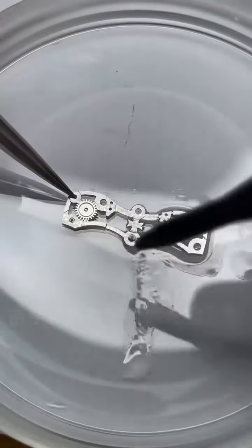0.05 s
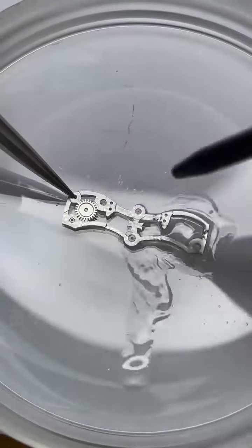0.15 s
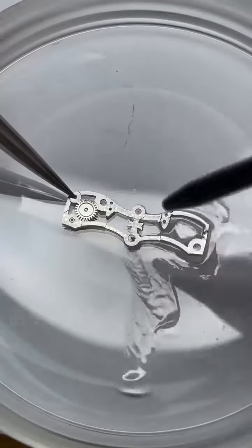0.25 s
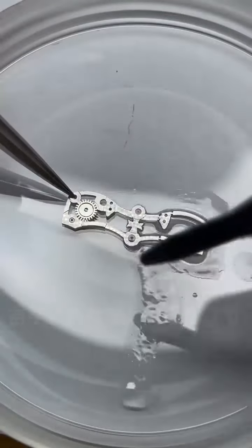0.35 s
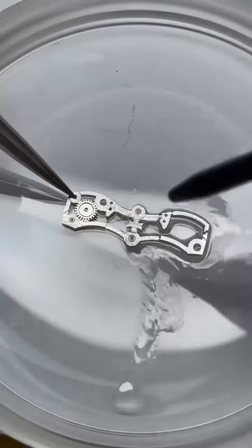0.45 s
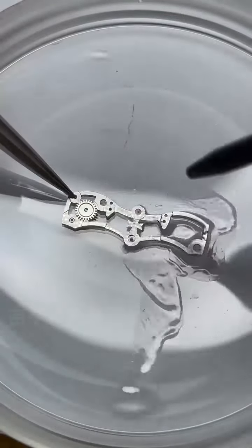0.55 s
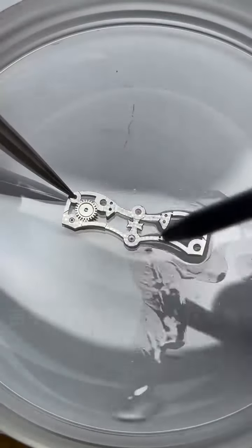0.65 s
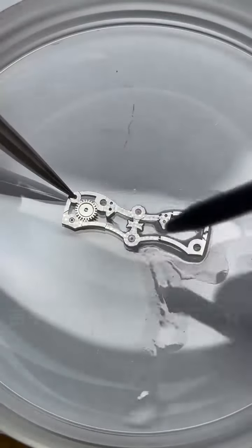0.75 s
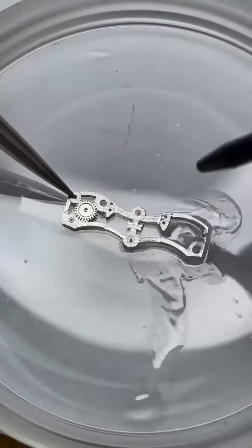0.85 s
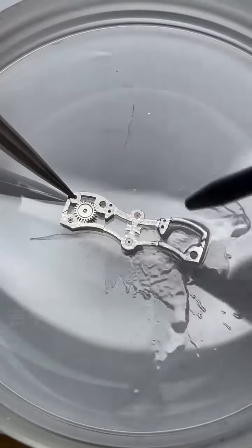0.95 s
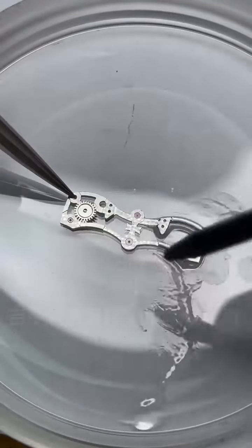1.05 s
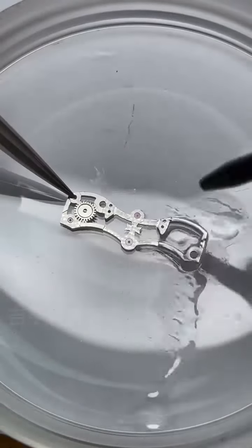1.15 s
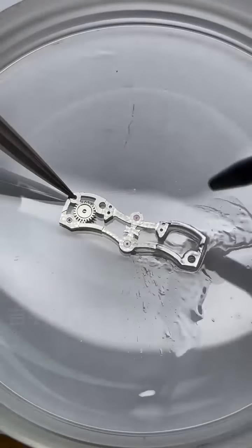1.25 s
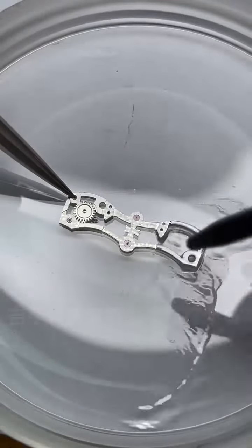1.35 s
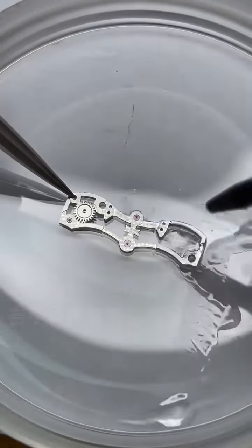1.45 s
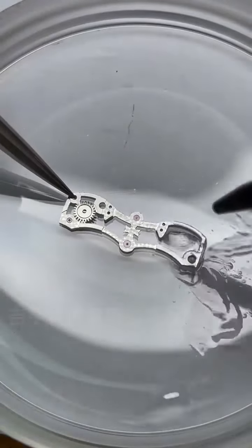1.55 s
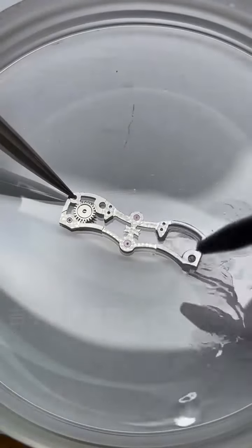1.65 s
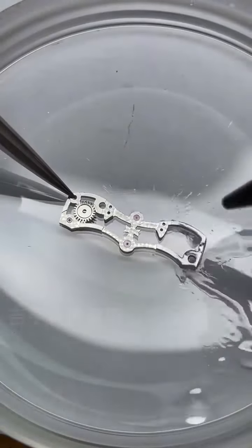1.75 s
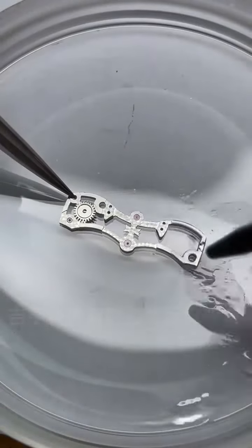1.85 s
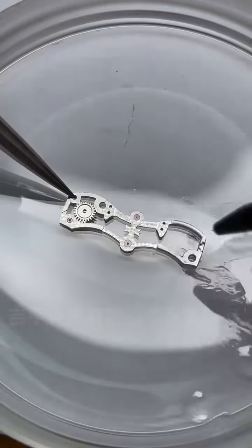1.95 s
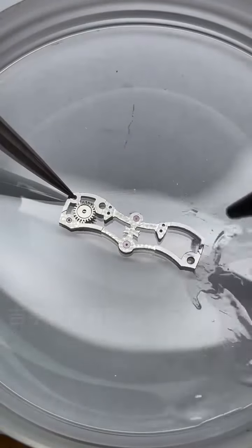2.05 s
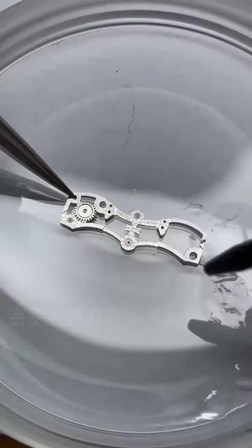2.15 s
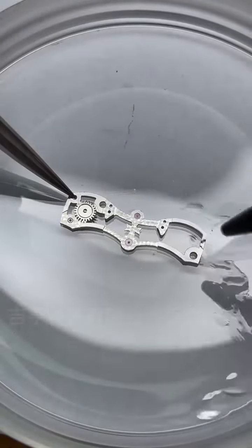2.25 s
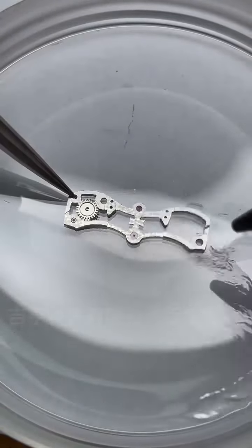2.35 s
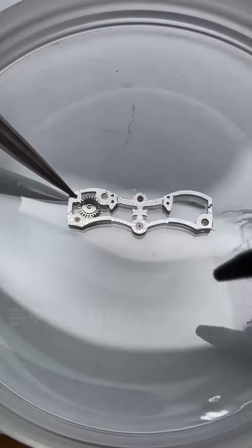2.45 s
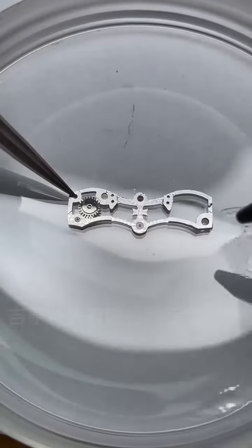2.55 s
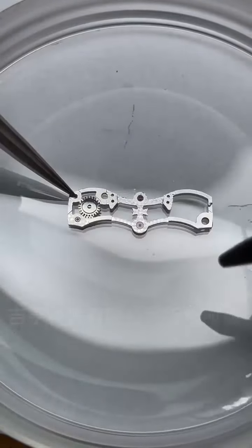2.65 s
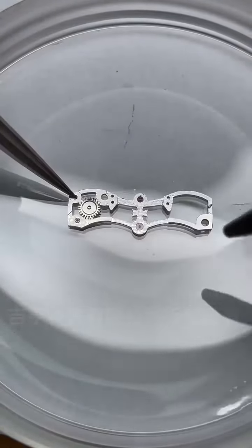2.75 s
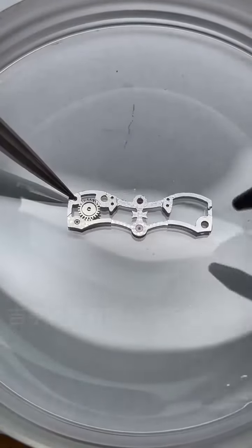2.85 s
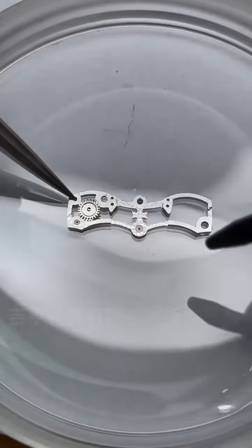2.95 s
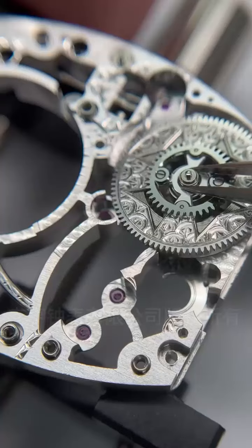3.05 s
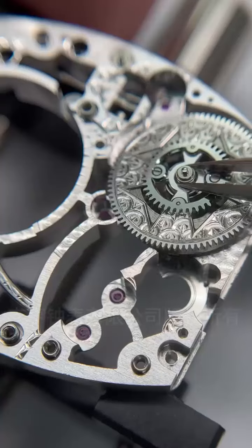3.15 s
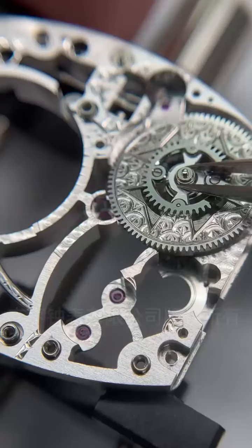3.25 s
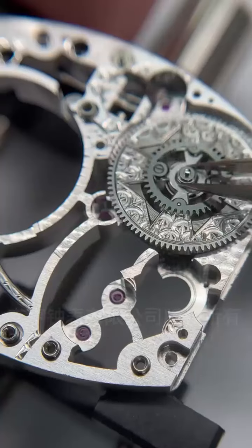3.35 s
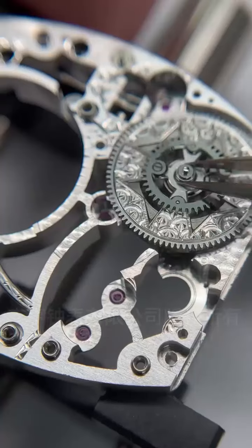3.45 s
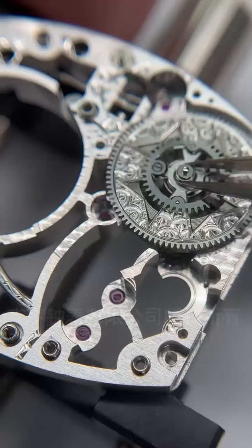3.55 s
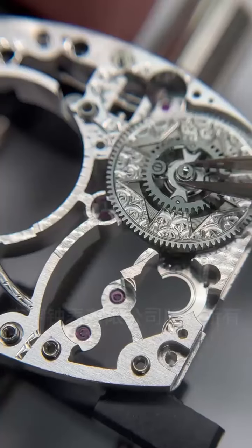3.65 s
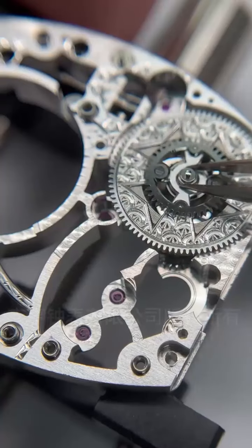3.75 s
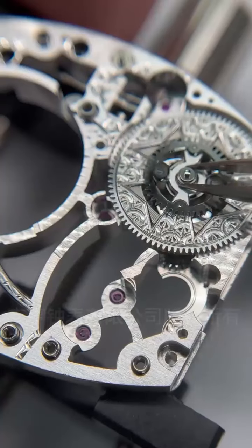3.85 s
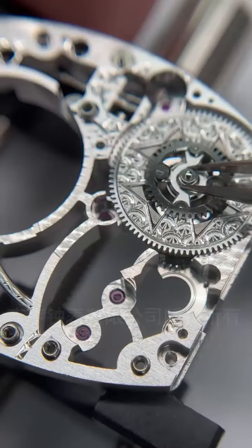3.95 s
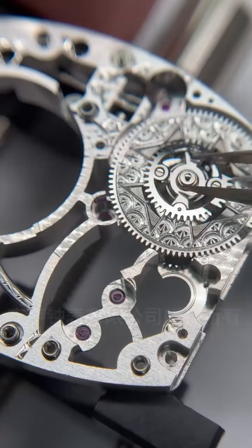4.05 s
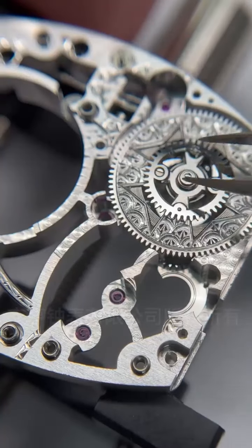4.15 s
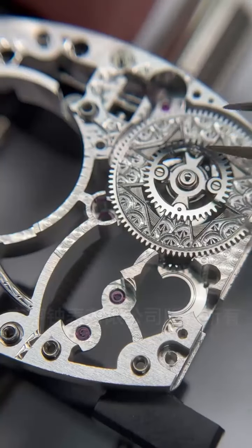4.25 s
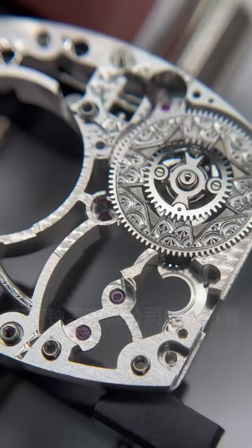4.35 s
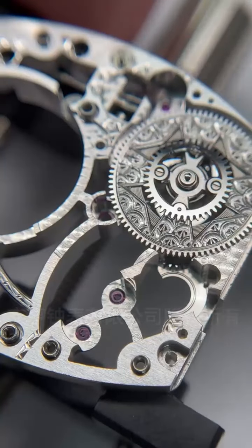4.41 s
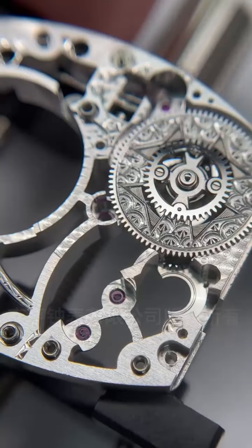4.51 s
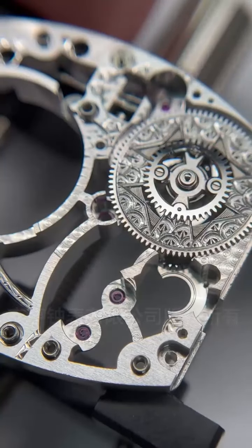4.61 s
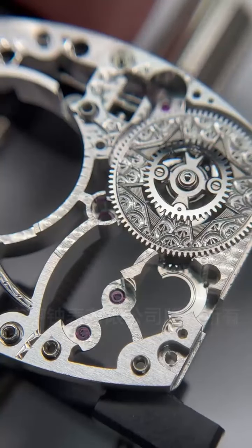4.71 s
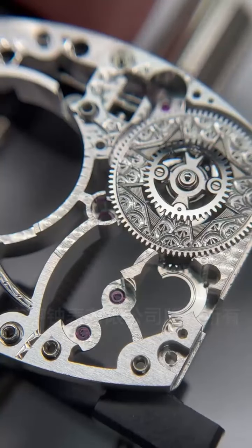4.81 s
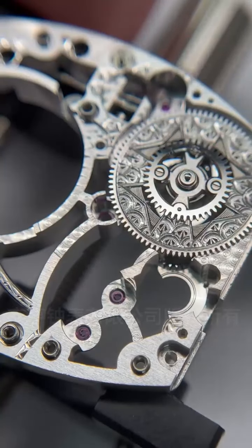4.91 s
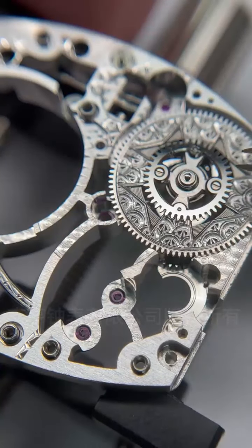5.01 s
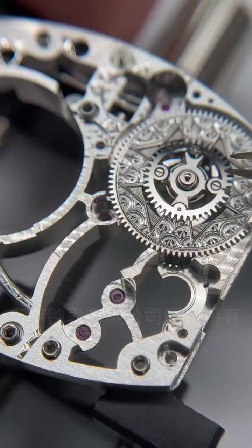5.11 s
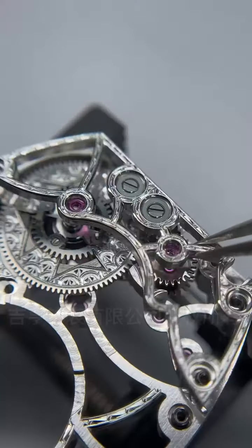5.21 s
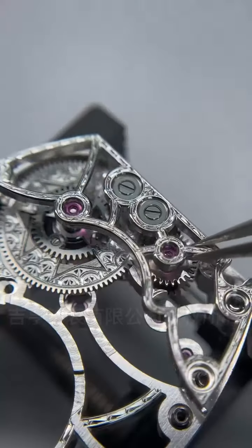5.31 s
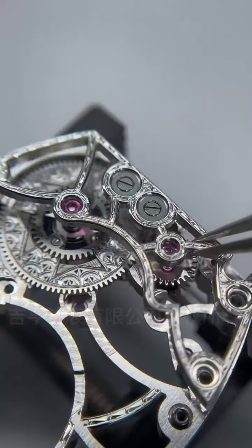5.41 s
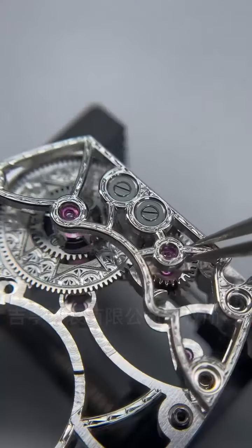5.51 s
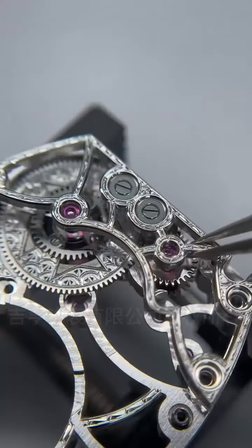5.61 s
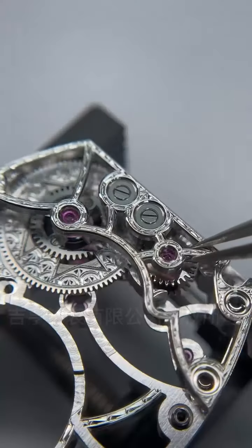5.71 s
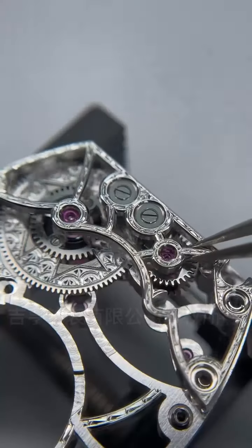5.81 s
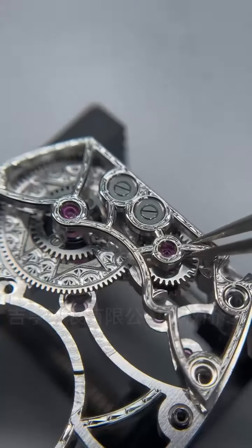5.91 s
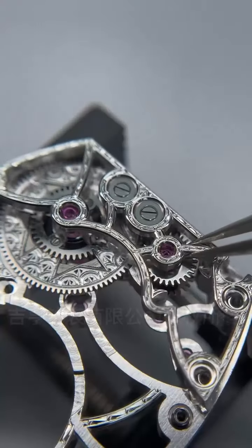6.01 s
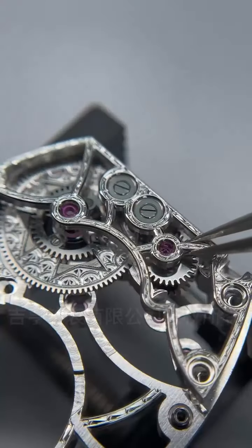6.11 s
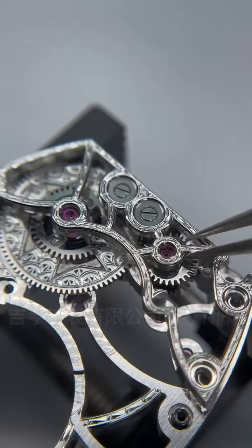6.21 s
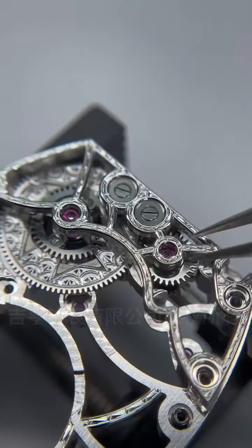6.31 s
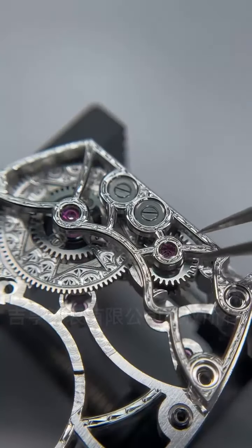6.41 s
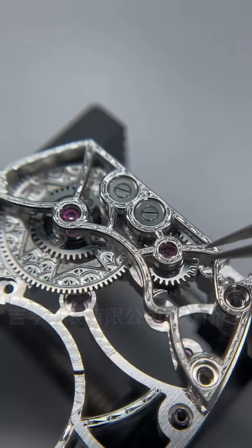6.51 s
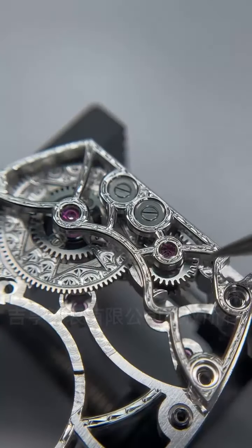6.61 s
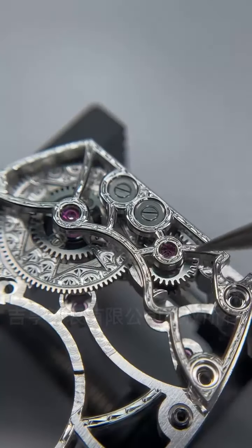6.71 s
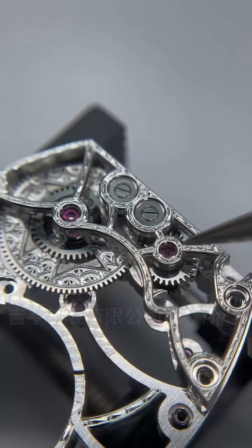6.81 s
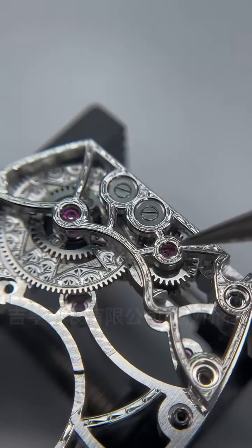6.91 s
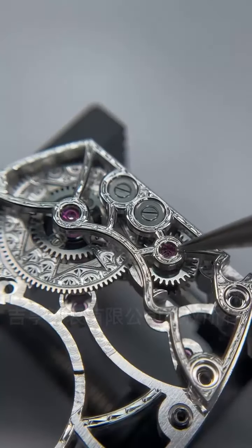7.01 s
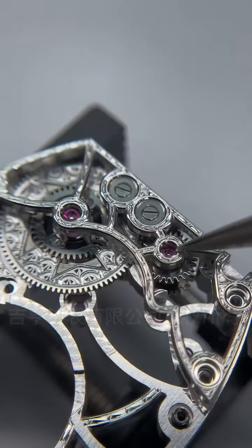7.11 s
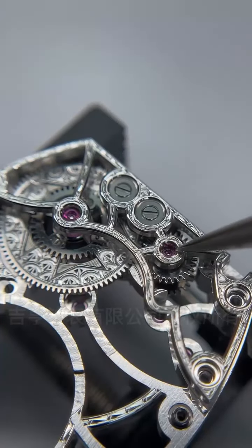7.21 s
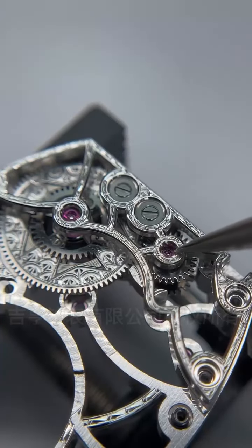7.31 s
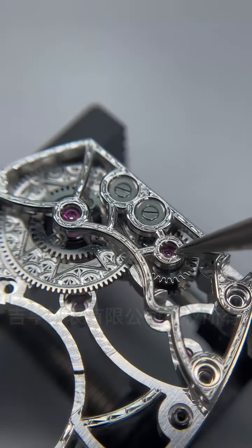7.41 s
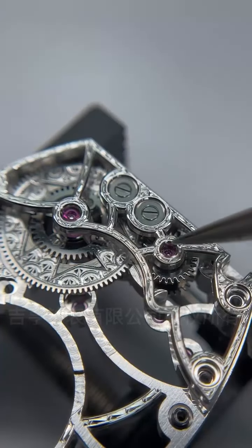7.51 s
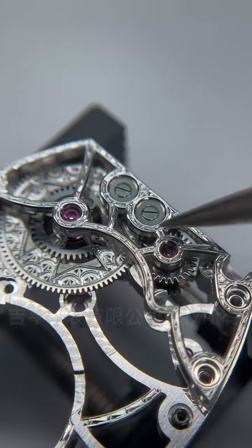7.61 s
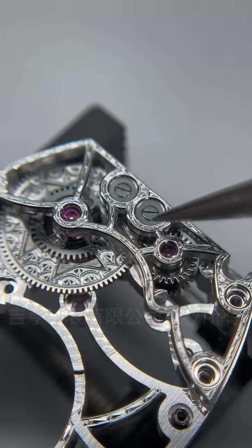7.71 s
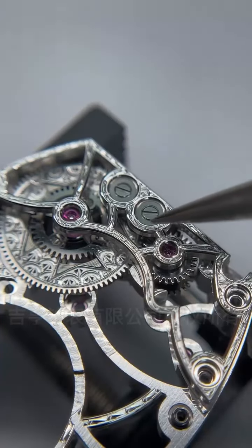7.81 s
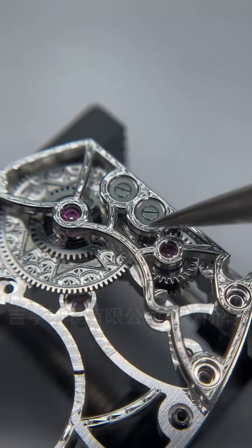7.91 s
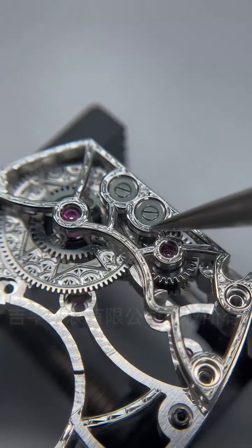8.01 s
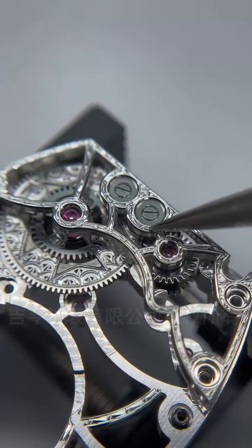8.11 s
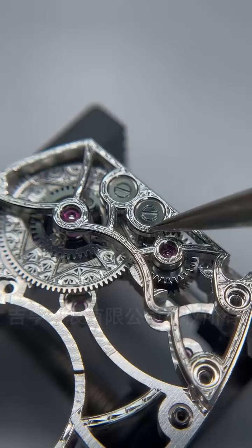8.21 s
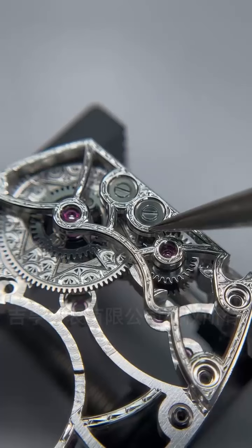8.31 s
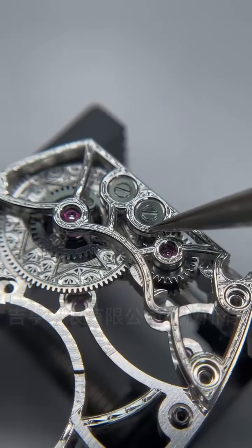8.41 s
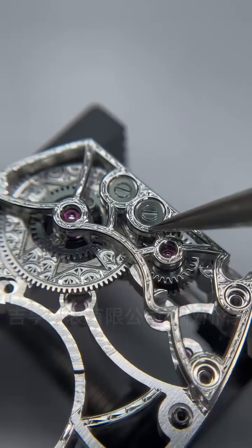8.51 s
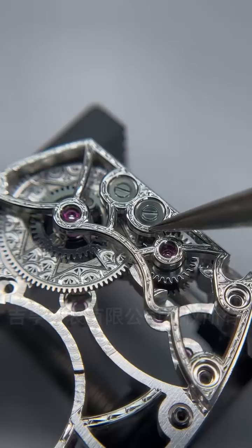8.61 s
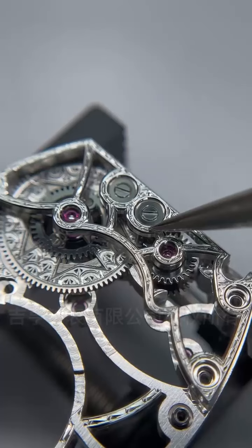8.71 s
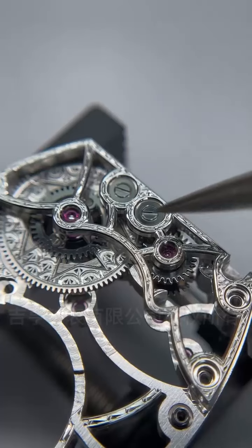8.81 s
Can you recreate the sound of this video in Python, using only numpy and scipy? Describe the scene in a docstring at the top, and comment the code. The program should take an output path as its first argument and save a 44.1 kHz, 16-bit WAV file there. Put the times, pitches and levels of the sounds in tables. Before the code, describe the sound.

Pulsing compressed air hisses and sputters across wet metal, liquid popping and drops knocking on the dish, the wet rasp thinning with each pass. The blowing stops suddenly. Close at a hushed bench, fine steel tweezers click and faintly scrape on watch parts, with a brief metallic ring, a dense cluster of ticks and soft thumps over ventilation rumble, wavering hum and a slight room tail.

```python
"""Blowing a steel part dry, then watch assembly

A thin air nozzle sweeps over a small steel part in a dish: filtered noise makes a bright hiss and a wet
rasp, while diving tones make plops as the film tears and short knocks make the drops.
The blowing stops short. At a quiet workbench, tweezers seat a wheel and a bridge in a watch movement:
filtered noise and ringing tones make light clicks, scrapes and thumps over a soft rush and a hum."""
import sys
import numpy as np
from scipy import signal
from scipy.fft import rfft, irfft, next_fast_len
from scipy.io import wavfile
from scipy.ndimage import map_coordinates

SR = 44100
rng = np.random.default_rng(int(sys.argv[2]) if len(sys.argv) > 2 else 0)


def output_pcm(signal):
    """Save a mono or channel-first signal as 16-bit PCM at the path in sys.argv[1].

    Samples are clipped to [-1, 1] before scaling.
    """
    pcm = np.clip(np.atleast_2d(signal).T, -1, 1) * 32767
    wavfile.write(sys.argv[1], SR, np.round(pcm).astype(np.int16))


N = 390725
TIME = np.arange(N) / SR  # (s)
JET_OFF_S = 2.973
# In all tables, level_db and level_db_per_hz are relative: the functions below may set a further level.


def amp(db):
    """Turns decibels into a gain."""
    return 10 ** (np.asarray(db) / 20)


def unit(x):
    """Scales to an rms of 1."""
    return x / np.sqrt(np.mean(x ** 2) + 1e-30)


def read(points, hz):
    """Reads a table along a log-frequency axis."""
    f, value = np.transpose(points)
    return np.interp(np.log(hz + 1), np.log(f + 1), value)


def over_time(points):
    """Draws straight lines between the (time, value) points of a table."""
    return np.interp(TIME, *np.transpose(points))


def add(mix, s, sound):
    """Mixes a sound in at time s."""
    part = mix[max(round(s * SR), 0):][:len(sound)]
    part += sound[:len(part)]


def sine(hz, t):
    """A pure tone."""
    return np.sin(2 * np.pi * hz * t)


def colour(x, spectrum):
    """Filters by a spectrum, keeping the power of white noise."""
    length = x.shape[-1]
    size = next_fast_len(length + 4096)
    gain = unit(amp(read(spectrum, np.fft.rfftfreq(size, 1 / SR))))
    return irfft(rfft(x, size) * gain, size)[..., :length]


def noise(spectrum, channels=2):
    """Makes unrelated coloured noises with an rms of about 1."""
    return colour(rng.standard_normal((channels, N)), spectrum)


def wander(per_s):
    """Smooth random motion of rms 1, with this many new targets per second."""
    knots = rng.standard_normal(8192)
    return unit(np.interp(TIME * per_s, np.arange(len(knots)), knots))


def until(s, fade):
    """One up to time s, then dying away."""
    return np.exp(-np.maximum(TIME - s, 0) / fade)


# Phase of left against right by pitch: pitch_hz, phase_rad
SIDE_PHASE = [(4100, 0), (4600, .6), (4860, 3.14), (5100, 5.4), (5400, 6.28), (6300, 6.35), (7000, 7.5),
              (8000, 8.6), (8700, 9.17), (8900, 9.39), (9350, 9.46), (9600, 9.78), (10000, 10.15),
              (11550, 11.6), (11850, 12.57), (13800, 12.6), (14300, 13.3), (14700, 15.3), (15500, 15.7)]
# How alike left and right are by pitch: pitch_hz, likeness (0-1, no unit)
SIDE_LIKENESS = [(100, 1), (1000, 1), (2400, 1), (3800, 1), (4600, 0.95), (4860, 1), (5150, 0.8),
                 (5600, 0.72), (6300, 1), (6800, 1), (7700, 0.45), (8100, 0.86), (8800, 1), (9500, 1),
                 (11400, 0.82), (12000, 0.89), (13600, 0.99), (14200, .55), (15200, 1)]


def spread(pair):
    """Spreads the sound between left and right, more widely in the treble."""
    size = next_fast_len(N + 4096)
    hz = np.fft.rfftfreq(size, 1 / SR)
    direct, scattered = rfft(pair, size)
    like = np.clip(read(SIDE_LIKENESS, hz), 0, .99995)
    common = direct * np.sqrt((1 + like) / 2)
    apart = scattered * np.sqrt((1 - like) / 2)
    turn = np.exp(1j * read(SIDE_PHASE, hz) / 2)
    left, right = (common + apart) * turn, (common - apart) / turn
    return irfft(np.array([left, right]), size)[:, :N]


EASE_S = 0.018  # sets how quickly each stretch of stronger sound comes and goes


def stretch(on, off):
    """How fully one stretch of stronger sound is under way, 0-1."""
    return (np.tanh((TIME - on) / EASE_S) - np.tanh((TIME - off) / EASE_S)) / 2


# Stretches of stronger hiss or rasp: long passes over the part, and brief bursts, some inside them:
# on_s, off_s, extra_hiss_db, extra_rasp_db
STRETCHES = [(0.108, .255, 6, 9.5), (.236, .25, 7, 2.5), (0.449, .615, 3.5, 11.5), (0.774, .995, 2.5, 7.5),
             (0.803, .832, 1.5, 2.5), (1.092, 1.305, 1.5, 8), (1.426, 1.578, 0.5, 7),
             (1.532, 1.56, 5, -3.5), (1.7, 1.86, 2, 4.5), (1.975, 2.092, 4, 3.5), (2.26, 2.52, 1.5, 3),
             (2.58, 2.62, 1, -1), (2.732, 2.845, 1.5, 3.5)]
# Strength of the air flow, heard as nozzle hiss: time_s, level_db
FLOW = [(0, -36), (.3, -33.5), (.72, -31), (1.05, -28), (1.45, -28), (1.65, -30), (2.2, -29.5),
        (2.6, -27.5), (2.96, -31.5)]
# The rasp of the jet beside the part starts at RASP_DB and fades as the liquid is driven off
RASP_DB, DRYING_DB_PER_S = -39, 2.5


def sweep():
    """Levels of the nozzle hiss and of the rasp in dB, and how hard the jet bites on the part (at most 1)."""
    lift, bite = np.zeros(N), np.zeros(N)
    for on, off, hiss_db, rasp_db in STRETCHES:
        stronger = stretch(on, off)
        lift += hiss_db * stronger
        bite += rasp_db * stronger
    hiss = over_time(FLOW) + lift
    rasp = RASP_DB - DRYING_DB_PER_S * TIME + bite
    return hiss, rasp, bite / bite.max()


# Level of the top of the hiss, which ends brighter than it began: time_s, level_db
TOP_LEVEL = [(0, -0.5), (.9, -1), (1.7, -0.5), (2.2, -1), (2.45, 1), (2.95, 1.5)]
TOP_HZ = 12000  # the top begins around here


def shimmer(x, patch_db=1.5, patch_s=.045, patch_hz=190, top_width_hz=600):
    """The colour of the hiss shifts in brief narrow patches, and its top drifts in level."""
    hz, t, z = signal.stft(x, SR, nperseg=1024, noverlap=768)
    knots = rng.standard_normal((600, 1500))
    grid = np.meshgrid(hz / patch_hz, t / patch_s, indexing="ij")
    patches = unit(map_coordinates(knots, grid, order=1, mode="wrap"))
    top_share = (1 + np.tanh((hz[:, None] - TOP_HZ) / top_width_hz)) / 2
    top = top_share * np.interp(t, *np.transpose(TOP_LEVEL))
    z = z * unit(amp(patch_db * patches)) * amp(top)
    return signal.istft(z, SR, nperseg=1024, noverlap=768)[1][:, :N]


# Resonances of the dish: pitch_hz, width_hz, lift_db
DISH = [(1943, 90, 3), (3073, 41, 2.5), (3340, 34, 4.5), (3860, 60, 3), (4060, 90, 4.5), (5390, 54, 1),
        (5824, 120, 0), (6300, 50, 3.5), (6930, 48.9, 3.5), (7240, 60, 3.5), (7806, 40, 4.5),
        (8120, 89, 0.5), (10530, 130.5, -0.5)]


def dish(x, echo=0.07, scatter_db=-21, t60=0.074):
    """The dish bottom returns the hiss a moment later; its walls scatter it and resonate."""
    lag = round(.000937 * SR)
    t = np.arange(2048) / SR
    response = rng.standard_normal(len(t)) * amp(-60 * t / t60) * (t > .002)
    response *= amp(scatter_db) / np.linalg.norm(response)
    response[0], response[lag] = 1, -echo
    for hz, width_hz, lift_db in DISH:
        strength = (amp(lift_db) - 1) * 2 * np.pi * width_hz / SR
        response += strength * np.exp(-np.pi * width_hz * t) * np.cos(2 * np.pi * hz * t)
    return signal.oaconvolve(x, response[None], axes=1)[:, :N]


# Colour of the bare nozzle hiss: pitch_hz, level_db_per_hz
NOZZLE = [(200, -48), (1150, -43), (1700, -39), (5000, -33.5), (7300, -25), (7880, -24.5), (8060, -5),
          (8900, -2.5), (9600, -1.5), (10200, 0.5), (11000, -6), (12200, -15.5), (13900, -22.5),
          (15400, -23)]
# Colour of the wet rasp on the part: pitch_hz, level_db_per_hz
RASP = [(700, -38.5), (1700, -28), (2700, -18), (3850, -9), (5000, -6.5), (5900, -0.5), (6600, -7),
        (7400, -0.5), (9000, -14), (14000, -30.5)]
# Colour of the fizz of the wet dish all round the jet: pitch_hz, level_db_per_hz
FIZZ = [(600, -25.5), (1200, -11), (1500, -3.5), (1950, 0), (2250, -3.5), (2900, 1), (4000, -5),
        (7000, -15), (14000, -29)]
# How loud that fizz is: time_s, level_db
FIZZ_LEVEL = [(0, -46), (1.2, -44), (1.7, -50), (2.95, -52.5)]


def jet(hiss, rasp, hiss_db=8.5, flutter_db=0.56, spit_db=0.04, grain_db=1.16):
    """Turbulence in the nozzle, on the wet part and around it; passing liquid makes all of them flutter."""
    flutter = flutter_db * wander(220)
    nozzle = noise(NOZZLE) * amp(hiss + hiss_db + flutter)
    on_part = noise(RASP) * amp(rasp + flutter + spit_db * wander(500))
    fizz = noise(FIZZ) * amp(over_time(FIZZ_LEVEL) + flutter + grain_db * wander(350))
    return dish(shimmer(nozzle, patch_db=1.8) + shimmer(on_part + fizz, patch_db=2.5))


# The film tears; short dives are dry taps: start_s, level_db, pitch_hz (at the start), dive_s
PLOPS = [(.009, -38.5, 520, 0.0029), (0.014, -32, 950, .005), (0.046, -44, 704, 0.0037),
         (.159, -44, 850, 0.0038), (.298, -39.5, 900, 0.003), (0.3201, -32, 950, .0042),
         (.364, -35, 1250, 0.0033), (0.489, -31, 1200, .0036), (.514, -45, 444, 0.0033),
         (.629, -42, 770, 0.0027), (0.655, -40, 750, 0.0019), (.668, -43.5, 900, 0.006),
         (.712, -45, 600, .002), (.725, -43.5, 790, 0.0038), (.788, -37, 1290, 0.0011),
         (0.812, -37.5, 1210, 0.0023), (.969, -39.5, 750, 0.0025), (.986, -33, 1150, 0.0013),
         (.996, -39, 1100, 0.0014), (1.004, -37, 170, 0.003), (1.059, -42.5, 850, 0.0054),
         (1.081, -45, 900, .0015), (1.112, -42, 1180, 0.0023), (1.148, -40.5, 915, 0.002),
         (1.236, -43.5, 907, 0.002), (1.342, -38.5, 1240, 0.0022), (1.362, -45, 710, 0.0053),
         (1.392, -45, 1020, 0.0022), (1.415, -44, 1100, 0.001), (1.447, -42, 1210, 0.00096),
         (1.469, -46, 850, .0015), (1.611, -41, 1293, 0.00093), (1.626, -41, 915, 0.0011),
         (1.668, -40, 930, 0.0033), (1.72, -44, 1160, 0.0024), (1.731, -42.5, 1200, 0.0017),
         (2.09, -43.5, 1020, 0.0026), (2.349, -48.5, 1540, 0.0023), (2.375, -43.5, 1790, .002),
         (2.415, -42.5, 1590, 0.0021), (2.635, -51, 2010, 0.0023)]
# Buffeting of the film, greatest while the jet drives off the bulk of the liquid: time_s, level_db
STIR = [(0, -48.5), (.65, -44.5), (1.45, -43.5), (2.15, -50.5), (2.8, -50)]
SHIELD_DB = 5.5  # the part shields the film when the jet bites fully
SHAKE_DB, SHAKE_S = -5, 0.031  # each tear leaves the film shaking: level against the plop, time to settle


def stirring(bite):
    """Unrest of the film in dB: smaller while the jet bites on the part, which shields it, and greater just
    after each tear."""
    power = amp(over_time(STIR) - SHIELD_DB * bite) ** 2
    settling = np.exp(-np.arange(SR // 4) / SR / SHAKE_S)
    for at, db, _, _ in PLOPS:
        add(power, at, (amp(db + SHAKE_DB) * settling) ** 2)
    return 10 * np.log10(power)


def plop(hz, dive, rest_hz=90, linger=3.1, rise=0.00028, splash=0.5, splash_linger=1.5):
    """A pocket in the liquid bursts and opens out, so its pitch dives; quick ones die sooner."""
    t = np.arange(3000) / SR
    pitch = rest_hz + (hz - rest_hz) * np.exp(-t / dive)
    wave = np.sin(2 * np.pi * np.cumsum(pitch) / SR)
    wave *= (1 - np.exp(-t / rise)) * np.exp(-t / (linger * dive))
    lowpass = signal.butter(2, 1.9 * hz, fs=SR)
    burst = unit(signal.lfilter(*lowpass, rng.standard_normal(len(t))))
    return wave / abs(wave).max() + splash * burst * np.exp(-t / (splash_linger * dive))


# Colour of the air buffeting the film: pitch_hz, level_db_per_hz
BUFFET = [(20, -21), (45, 1), (80, 1), (130, -6.5), (250, -22.5), (600, -17.5), (1300, -21), (3000, -40)]


def liquid(stir, buffet_db=-4, gust_db=3.0, small_db=-3.5, spread_db=5.5, count=150):
    """The jet buffets the film and tears it: a few dozen timed plops and many at random times."""
    plops = np.zeros(N)
    for at, db, hz, dive in PLOPS:
        add(plops, at, amp(db) * plop(hz, dive))
    for when, size, pitch in rng.random((count, 3)):
        at = when * JET_OFF_S
        db = stir[int(at * SR)] + small_db + spread_db * (2 * size - 1)
        add(plops, at, amp(db) * plop(450 + 1300 * pitch, dive=0.0013))
    buffeting = spread(noise(BUFFET)) * amp(stir + buffet_db + gust_db * wander(22))
    return plops + buffeting


def tick(hz):
    """A drop lands: a knock of a cycle or two."""
    cycles = hz * np.arange(400) / SR
    return np.sin(2 * np.pi * cycles) * np.exp(-cycles)


# Flung drops tick against the dish: start_s, level_db, pitch_hz
DROPS = [(.18, -28.5, 6000), (.2425, -16.5, 8000), (0.533, -15.5, 6500), (0.788, -22, 6500),
         (0.8915, -11, 7500), (1.554, -38.5, 2200), (2.157, -33, 1780), (2.758, -32, 9000)]


def spray(rasp, fine_db=-35, spread_db=0.5, count=220):
    """A few large drops and a fine spatter, louder while the jet bites on the part."""
    out = np.zeros(N)
    for at, db, hz in DROPS:
        add(out, at, amp(db) * tick(hz))
    for when, size, pitch in rng.random((count, 3)):
        at, hz = when * JET_OFF_S, 1600 * 4 ** pitch
        bite_db = .5 * (rasp[int(at * SR)] - RASP_DB)
        size_db = spread_db * min(-np.log(1 - size), 3)  # most drops are small
        add(out, at, amp(fine_db + bite_db + size_db) * hz / 3500 * tick(hz))  # quick knocks peak higher
    return out


# Colour of the workshop air: pitch_hz, level_db_per_hz
ROOM = [(20, -20), (45, 0.5), (95, 0), (120, -11.5), (290, -9.5), (400, -19), (700, -25.5), (1060, -25.5),
        (1170, -38.5), (2000, -54), (5500, -58), (7700, -53), (10200, -51), (13000, -66)]
# Colour of a soft rush of air: pitch_hz, level_db_per_hz
RUSH = [(100, 5.5), (200, 11.5), (500, -3.5), (1100, -6.5), (1400, -8), (1900, -13.5), (2300, -20),
        (3000, -36), (6000, -40), (14000, -67)]
# The rush is high during the wheel work, then wavers: time_s, level_db
RUSH_LEVEL = [(3, -59), (4.4, -59.5), (4.9, -58), (5.19, -59), (5.21, -79), (5.5, -69), (5.68, -83),
              (5.82, -67), (5.96, -73), (6.22, -66), (6.42, -75), (6.68, -68), (6.85, -77), (7.3, -78),
              (7.45, -70), (7.7, -74), (8.25, -71.5), (8.4, -79), (8.55, -67), (8.85, -70.5)]
# Colour of a deep rumble: pitch_hz, level_db_per_hz
RUMBLE = [(20, -28), (38, -9.5), (47, -1.5), (58, -7), (120, -33), (400, -71), (2000, -110)]
# The rumble swells and sinks: time_s, level_db
SWELL = [(7.05, -70), (7.35, -47.5), (7.55, -66), (7.78, -44), (8.05, -66), (8.3, -61)]
# Tones of the machine hum: pitch_hz, level_db
HUM = [(48.4, -59.5), (145.3, -61), (253.0, -63.5), (360.7, -66.5), (452.2, -71.5), (600, -76.5),
       (662.1, -76.5), (802.1, -73), (990, -75.5), (1012, -74.5), (1045, -80.5)]
# Diffuse part of the air, opposite on left and right: pitch_hz, level_db_per_hz
DIFFUSE = [(20, -19), (50, -4), (80, -8.5), (100, -13), (280, 1), (1000, -0.5), (1200, -11), (2000, -33.5),
           (4000, -36.5), (13000, -64)]


def workshop(air_db=-51.0, drift_db=0.18, hum_db=-1.0, diffuse_db=-67, waver_hz=3.6, throb=0.34):
    """Ventilation rumble, a soft rush of air that swells and sinks, and the wavering hum of a machine."""
    air = noise(ROOM) * amp(air_db + drift_db * wander(3.7))
    rush = noise(RUSH) * amp(over_time(RUSH_LEVEL))
    rumble = noise(RUMBLE) * amp(over_time(SWELL))
    hum = np.zeros(N)
    for hz, db in HUM:
        pitch = hz + waver_hz * np.sqrt(hz / 100) * wander(70)  # higher tones waver by more hertz
        turns = np.cumsum(pitch) / SR
        level = amp(db + hum_db) * (1 + throb * wander(9.8))
        hum += level * np.sqrt(2) * np.sin(2 * np.pi * turns)
    diffuse = amp(diffuse_db) * noise(DIFFUSE, channels=1) * np.array([[1], [-1]])
    return spread(air + rush + rumble) + hum + diffuse


# Colour of a contact on the steel tips: pitch_hz, level_db_per_hz
TIPS = [(1000, -46), (5200, -20), (6800, -7), (7650, 6.5), (8500, -0.5), (9400, 4.5), (10600, 0.5),
        (11800, -10), (12600, -8), (15500, -32)]
# Colour of a contact on the main plate: pitch_hz, level_db_per_hz
PLATE = [(200, 21), (900, 0), (1800, 5), (2400, -1), (2950, 6), (3500, -15), (4100, 1.5), (4800, -9),
         (5350, -17), (6000, -15), (8000, -9), (9700, -3), (12000, -22)]


def steel_colour(x, share_db, tips_db=-6, plate_db=-10):
    """A contact sounds through the tips and, by its share, through the main plate."""
    return amp(tips_db) * colour(x, TIPS) + amp(plate_db + share_db) * colour(x, PLATE)


# Ringing of the steel: pitch_hz, level_db, t60_s (time to fall by 60 dB)
STEEL = [(3720, -11, .12), (6050, -9, .038), (7820, -9, .08), (7550, -19, .33), (9450, -12, .059),
         (10380, -16, .18), (11550, -27, .12), (12940, -12, .05)]


def contact(share_db, t60, top_hz, note_hz, note_db, ring_db=-42, note_linger=0.9,
            slide_db=-27, slide_t60=0.078, vary_db=3, rise=0.00036):
    """A brief chatter of steel on steel, a faint slide and ringing tones, cut off above top_hz."""
    t = np.arange(SR // 3) / SR
    attack = 1 - np.exp(-t / rise)
    fading = amp(-60 * t / t60) + amp(slide_db - 60 * t / slide_t60)  # chatter, then slide
    sound = steel_colour(rng.standard_normal(len(t)) * attack * fading, share_db)
    sound += attack * amp(note_db - 60 * t / (note_linger * t60)) * sine(note_hz, t)
    each_spot = rng.uniform(-0.94, 1, (len(STEEL), 2))  # each spot rings differently
    for (hz, db, ring_t60), (phase, size) in zip(STEEL, each_spot):
        level = amp(ring_db + db + vary_db * size - 60 * t / ring_t60)
        sound += level * np.sin(2 * np.pi * (hz * t + phase))
    lowpass = signal.butter(8, min(top_hz, 20000), fs=SR, output="sos")
    return signal.sosfilt(lowpass, sound)


def scrape(length, share_db, slips_per_s=300, slip_s=.0006):
    """Uneven tiny slips of steel on steel under one short stroke."""
    t = np.arange(SR // 8) / SR
    starts = rng.random(len(t)) < slips_per_s / SR
    slips = signal.lfilter([1], [1, -np.exp(-1 / (slip_s * SR))], starts)
    grit = unit(steel_colour((.3 + slips) * rng.standard_normal(len(t)), share_db))
    stroke = np.sin(np.pi * np.minimum(t / length, 1))
    return grit * np.sqrt(np.maximum(stroke, 0))


def room_tail(x, t60=0.24):
    """Dense faint reflections, different in each of two channels."""
    t = np.arange(SR // 2) / SR
    tail = rng.standard_normal((2, len(t))) * amp(-60 * t / t60) * (1 - np.exp(-t / 0.0015))
    return signal.fftconvolve(x[None], tail / np.linalg.norm(tail[0]), axes=1)[:, :N]


# Tweezer contacts, with the share of the main plate and the note of the touched piece:
# start_s, level_db, plate_share_db, t60_s, note_hz, note_db
CLICKS = [(3.0412, -43.5, 6, 0.01, 9780, -3), (3.057, -41.5, 8, .011, 5360, -6),
          (3.0625, -51, 6, 0.013, 4080, -3), (3.158, -66, 18, 0.024, 2160, -8),
          (3.282, -60.5, 12.5, .029, 7300, -10), (3.3245, -48, -11, 0.0072, 10730, 5),
          (3.342, -53, -8, .012, 10730, -6), (3.350, -37.5, 6.5, 0.0061, 10000, -1),
          (3.718, -31, 5.5, 0.0097, 9850, 0), (3.726, -48, 3, .012, 7650, -8),
          (4.0510, -25.5, -4, 0.0078, 7850, 0.5), (4.053, -36.5, 5.5, 0.014, 10220, 3),
          (4.079, -59, 5, .015, 4305, -16), (5.661, -59, -10, .015, 11900, -8),
          (5.905, -59, -12, .012, 12000, -6), (5.925, -41, -10, 0.01, 9570, 2),
          (5.929, -56, -12, 0.012, 7620, -2), (6.061, -48, -17, .014, 10130, 3),
          (6.1377, -23, -17, 0.01, 7660, -2), (6.143, -22, -21, .012, 9600, -3),
          (6.1472, -25, -16, .015, 7840, -8), (6.148, -55, 5, .035, 3700, -3),
          (6.181, -35, -21, 0.013, 9400, -4), (6.1835, -27.5, -22, 0.018, 11020, -13),
          (6.1978, -36, -14, .014, 11800, -10), (6.206, -45, -12, .014, 9500, -10),
          (6.218, -29, -22, 0.015, 7160, -4), (6.2205, -31, -12, .010, 11700, -7),
          (6.231, -43, -10, .018, 7600, -6), (6.54, -57, 3, .012, 2960, -13),
          (7.0063, -50, -5, 0.017, 7560, -2), (7.013, -50.5, -2, 0.019, 3704, -16),
          (8.1696, -23.5, -23, .008, 7620, -10), (8.17, -46, 0, .014, 5900, -2)]
# A firm touch reaches FIRM_TOP_HZ; softer ones are duller
FIRM_DB, FIRM_TOP_HZ, DULLING_HZ_PER_DB = -17, 13500, 73
# The tips drag over the steel: start_s, length_s, level_db, plate_share_db
SCRAPES = [(4.055, 0.065, -72, 5), (6.131, .028, -57, -12), (6.165, 0.11, -70, 0), (6.997, .05, -75, 0)]
# The wheel rings on as it drops into its seat: pitch_hz, level_db, t60_s
WHEEL = [(2230, -61, 0.068), (2900, -64, .05), (2998, -62, 0.071), (4140, -57, 0.0385), (10350, -58, .14),
         (10480, -62, .11)]
SEATED_S = 4.052
# The holder is pushed against the bench: start_s, level_db, pitch_hz
THUMPS = [(3.72, -41.5, 382), (4.052, -46, 320), (6.138, -41, 460), (6.217, -43, 161), (8.171, -44, 320),
          (8.495, -40, 76)]


def tweezers(wet_db=-19, far_db=-11, thump_cycles=12):
    """Clicks, scrapes, the ringing wheel and soft thumps on the bench, with the small room around them."""
    t = np.arange(SR // 4) / SR
    dry = np.zeros(N)
    for s, db, share_db, t60, note_hz, note_db in CLICKS:
        top_hz = FIRM_TOP_HZ + DULLING_HZ_PER_DB * (db - FIRM_DB)
        add(dry, s, amp(db) * contact(share_db, t60, top_hz, note_hz, note_db))
    for s, length, db, share_db in SCRAPES:
        add(dry, s, amp(db) * scrape(length, share_db))
    for hz, db, t60 in WHEEL:
        add(dry, SEATED_S, amp(db - 60 * t / t60) * sine(hz, t))
    for s, db, hz in THUMPS:
        add(dry, s, amp(db - 60 * t * hz / thump_cycles) * sine(hz, t))
    near, far = room_tail(dry, t60=0.27)
    bench = room_tail(dry, t60=0.011)  # close reflections, unrelated on left and right
    return spread(np.array([dry + amp(wet_db) * near, amp(wet_db) * far])) + amp(far_db) * bench


def scene(linger=0.27):
    """First the blowing, which stops short but for a brief tail, then the bench work."""
    blowing = (1 - linger) * until(JET_OFF_S, 0.00031) + linger * until(JET_OFF_S, 0.006)
    hiss, rasp, bite = sweep()
    drops = np.outer([1, 0], spray(rasp))  # direct sound only, nothing scattered
    cleaning = spread(jet(hiss, rasp) + drops) + liquid(stirring(bite))
    return cleaning * blowing + workshop() * (1 - blowing) + tweezers()


EDGE_HZ = 15550  # hardly anything passes above this


def record(dry):
    """The recorder's band limit: a steep filter takes away the highest treble."""
    lowpass = signal.firwin(511, EDGE_HZ, window=("kaiser", 9), fs=SR)
    return signal.oaconvolve(dry, lowpass[None], "same")


dry = scene()
out = record(dry)
output_pcm(out)
```